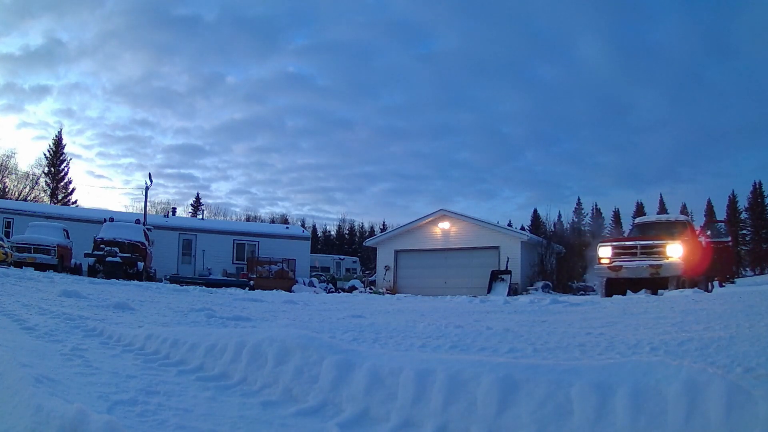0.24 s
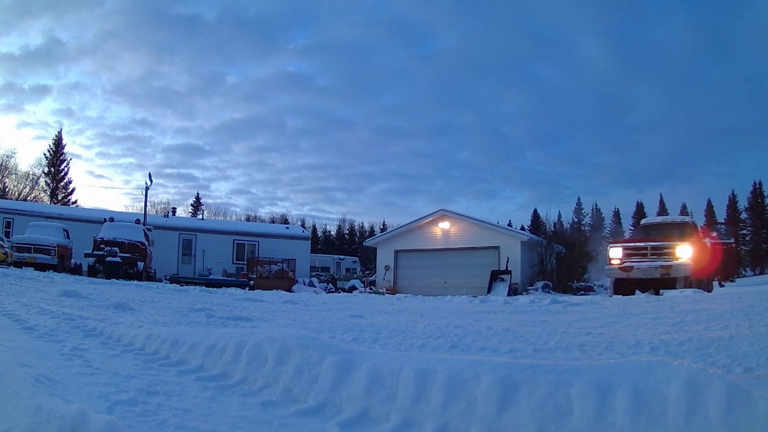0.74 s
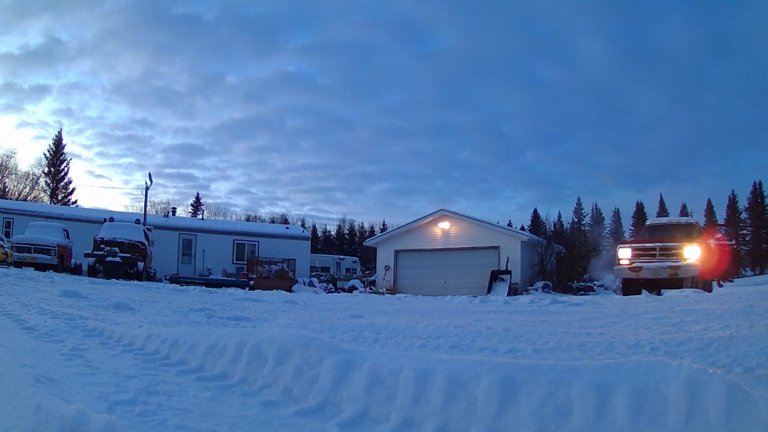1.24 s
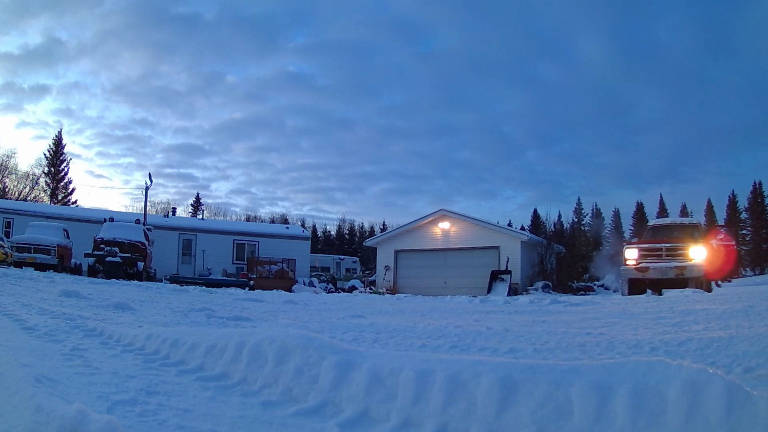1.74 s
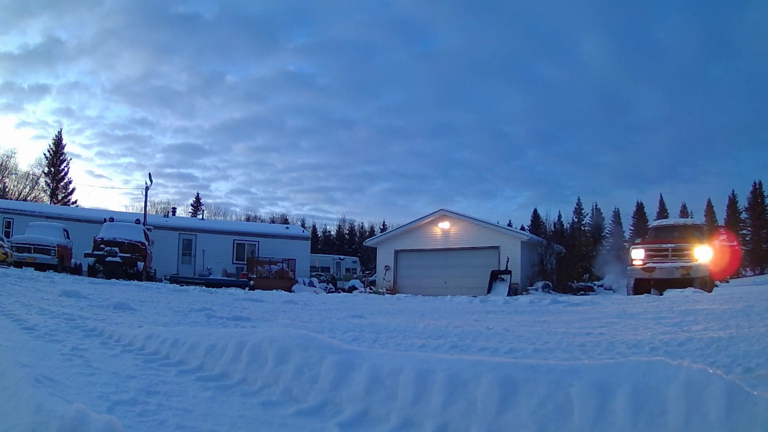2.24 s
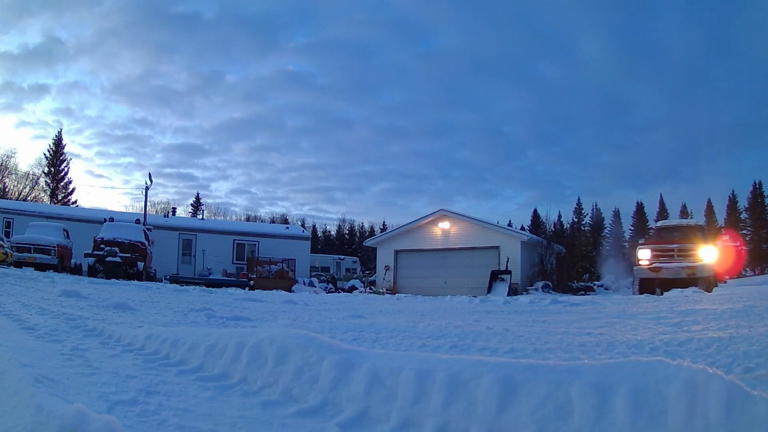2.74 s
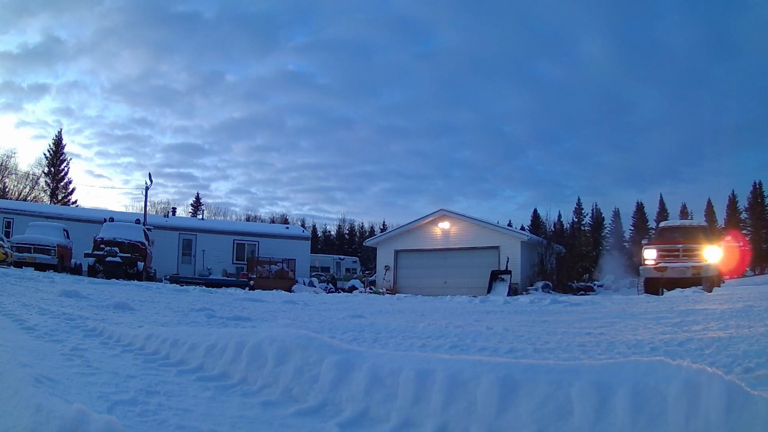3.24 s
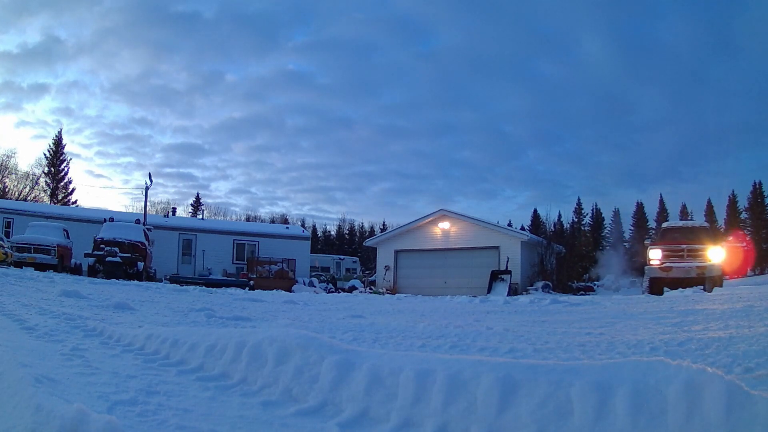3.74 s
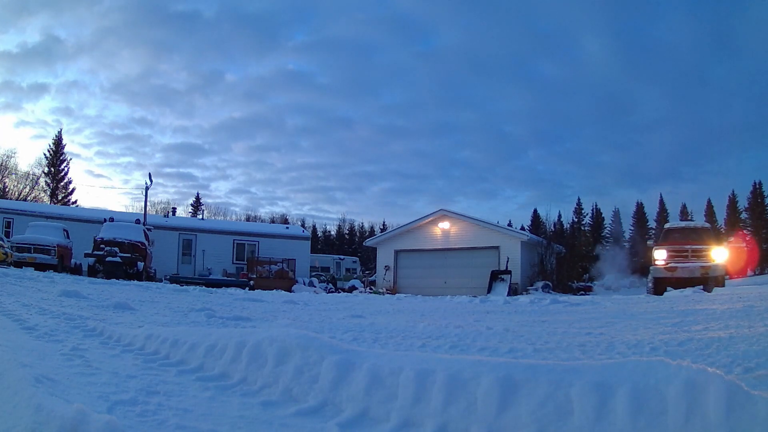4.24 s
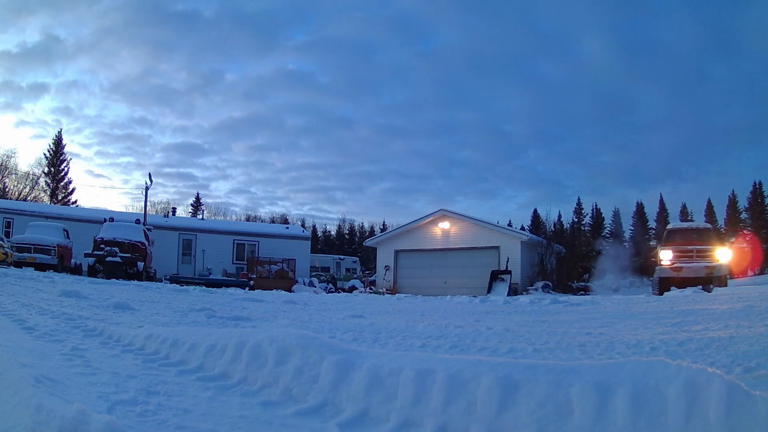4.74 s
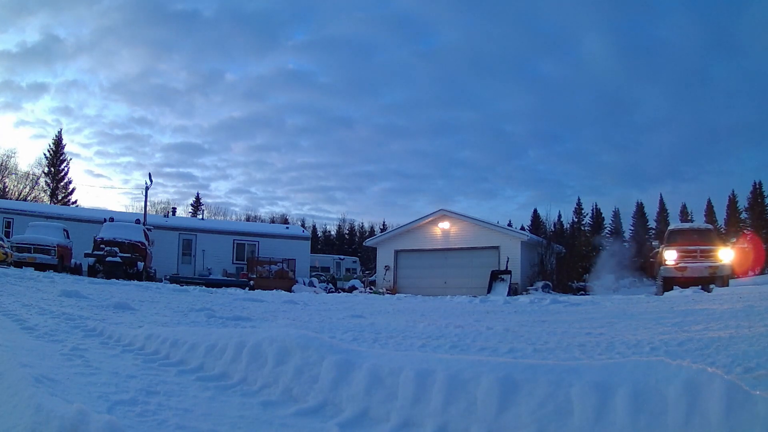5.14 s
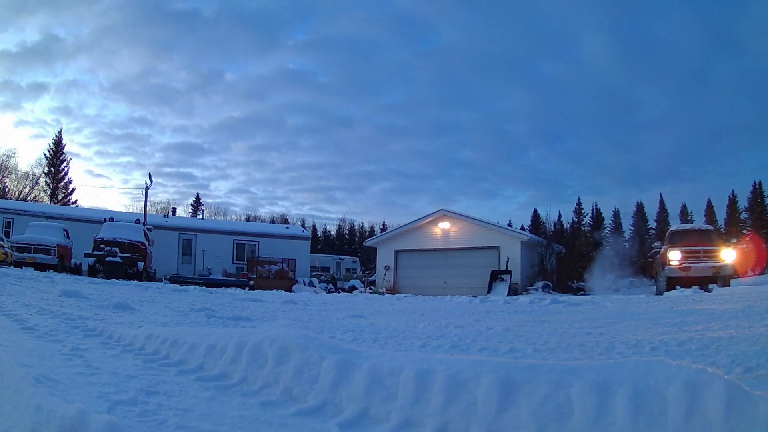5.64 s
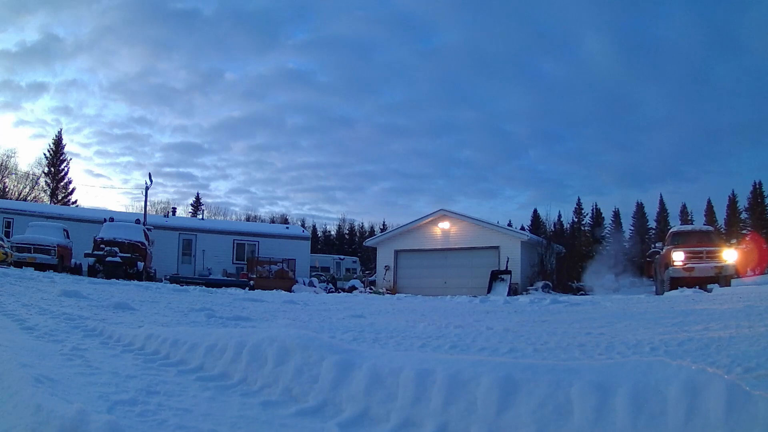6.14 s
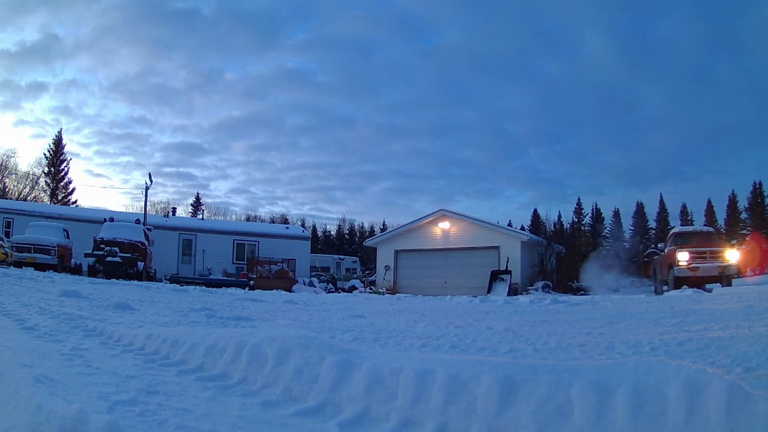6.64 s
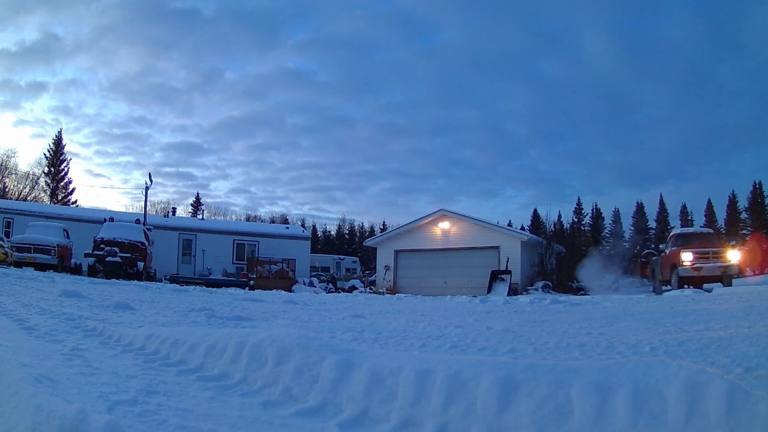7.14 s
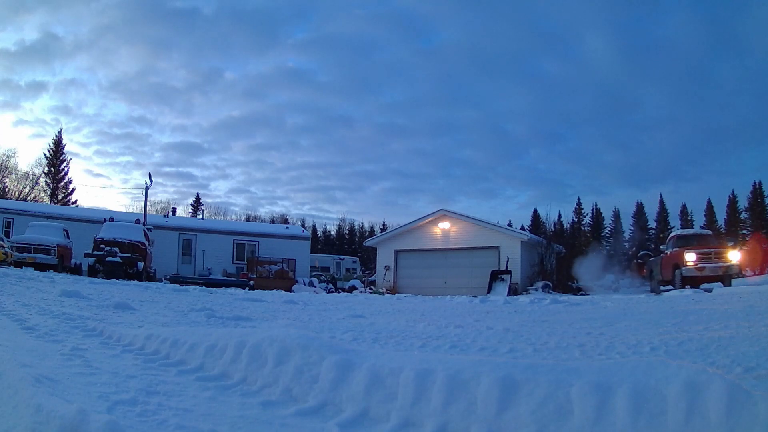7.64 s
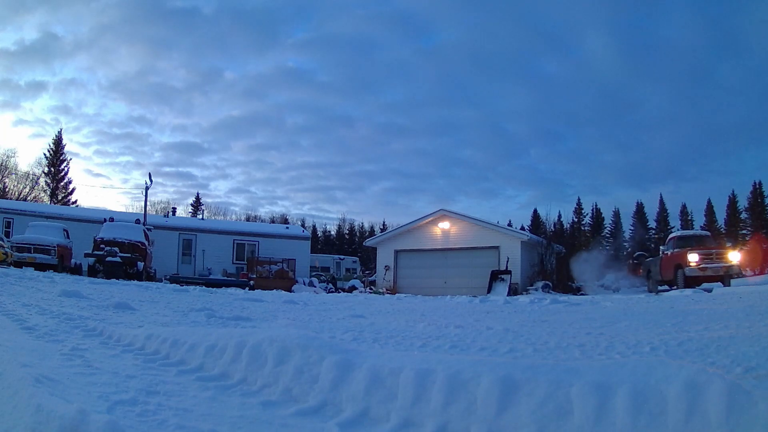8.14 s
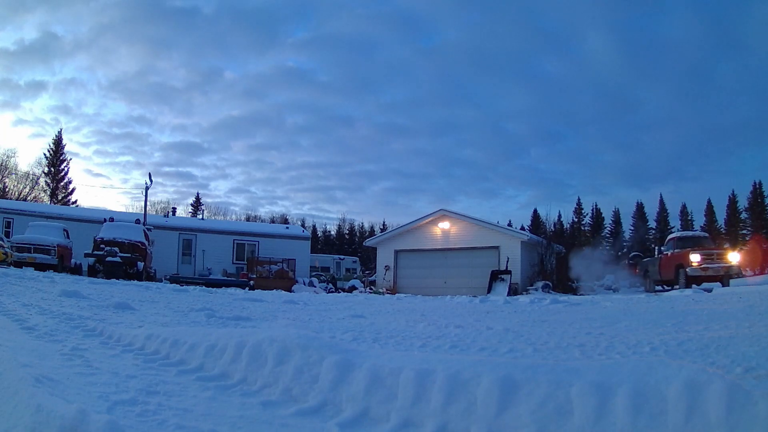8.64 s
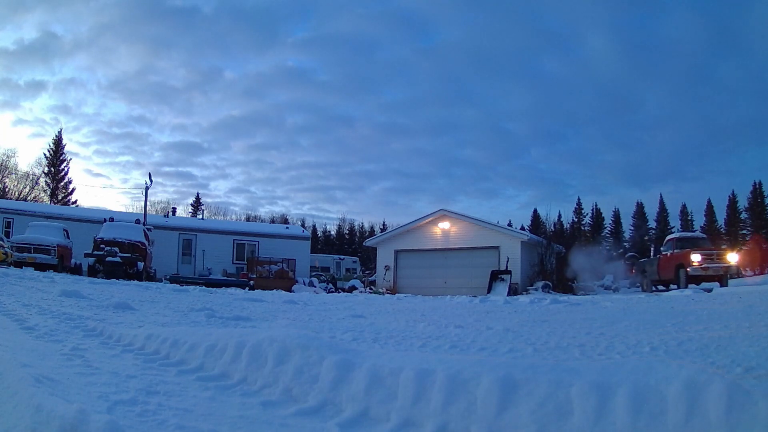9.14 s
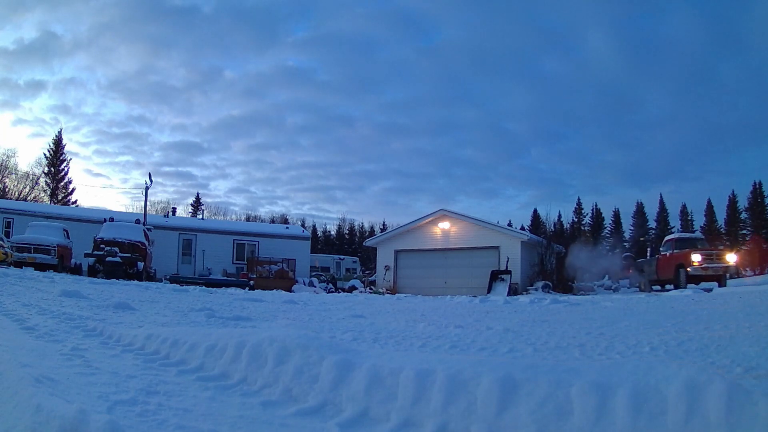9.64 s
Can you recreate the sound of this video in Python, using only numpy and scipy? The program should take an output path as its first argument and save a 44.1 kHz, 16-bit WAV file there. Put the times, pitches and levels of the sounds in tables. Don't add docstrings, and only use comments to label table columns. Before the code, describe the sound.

Outdoors in a snowy yard, a pickup truck with an eight-cylinder engine idles softly and burbles. At about one second hitch links rattle and clunk, then the revs climb into a deep, loud exhaust drone. The drone strengthens, gains hard knocking late on, then drops abruptly to a quiet idle near nine seconds. A single fixed microphone some distance away adds faint hiss.

```python
import sys
import numpy as np
from scipy import signal
from scipy.fft import rfft, irfft
from scipy.io import wavfile

SR = 44100
rng = np.random.default_rng(int(sys.argv[2]) if len(sys.argv) > 2 else 0)


def log_audio(samples):
    frames = np.atleast_2d(samples).T
    limited = np.clip(frames, -1, 1)
    pcm = np.round(limited * 32767).astype(np.int16)
    wavfile.write(sys.argv[1], SR, pcm)


def volts_from_db(level):
    exponent = np.asarray(level, float) / 20
    return 10 ** exponent


N = 437031

# pitch_hz, level_db (per Hz)
HISS = [(2940, -23), (5000, -16), (6100, -14), (6630, -5.5), (10000, -4), (11900, -4), (15200, -4.5),
        (16000, -7)]
HISS_DB = -62.5
# pitch_hz, level_db
WHINE = [(13749, -87)]

# start_s, level_db
HITCH_RATTLE = [
    (.92, -71),
    (.95, -68),
    (.97, -50.5),
    (1.0, -58.5),
    (1.035, -63),
    (1.05, -75),
]
# pitch_hz, width_hz, level_db
HITCH_RING = [(4500, 250, 2), (3450, 400, -9), (5600, 700, -14), (2000, 1000, -1)]

# pitch_hz, level_db (per Hz)
CLATTER = [(500, 2), (800, -2), (1300, -4), (2000, -6), (2800, -9.5), (4000, -19.5), (6000, -13.5),
           (8000, -25.5)]
# pitch_hz, width_hz, level_db
BLOCK_PANELS = [(1320, 79, 2), (3493, 176, 0), (4420, 440, -2), (5450, 270, -4.5)]
CLATTER_DB, CLATTER_LOAD_DB = -60.5, 2.1
IDLE_PANELS_DB, FACING_PANELS_DB = 2.5, -1.5

# pitch_hz, width_hz, level_db
KNOCK_RING = [(1800, 450, -5), (2500, 260, 1), (2950, 350, -6), (4450, 300, -8), (5300, 500, -10)]
KNOCK_CYLINDERS_DB = [0, -9, -3.5, -2, -8, -4, -7, -3.5]
KNOCK_REST_DB, KNOCK_BITE_DB, KNOCK_PEAK_DB = -80, -69, -62.3

# pitch_hz, width_hz, level_db
TAILPIPE = [(243.5, 48, 1.5), (278.4, 27, 2.5), (337, 63, -6.5), (413, 128, -14)]
RASP_DB, RASP_FADE_DB_PER_S, RASP_STRAIN_DB = -47, -0.75, -8

# pitch_hz, level_db (per Hz)
ROAR = [(20, -10), (30, -6), (50, -8), (75, -2), (100, -1), (150, -4), (200, -4), (270, -7), (340, -14),
        (450, -20), (600, -26), (800, -33), (1100, -45)]
ROAR_DB, ROAR_LOAD_DB, ROAR_TURN_DB = -48, 3.5, -4

# start_s, firing_rate_hz, exhaust_tone_db
RUN = [(0, 44.1, -39.6), (.9, 44.7, -39.6), (1.1, 41.5, -40), (1.3, 45.6, -39.7), (1.6, 50.3, -42),
       (1.76, 54.7, -30.5), (1.96, 57.6, -30.3), (2.9, 57.4, -29.8), (3.8, 59.8, -26.8), (4.38, 62.2, -22),
       (4.62, 61.2, -23.8), (5.0, 62.4, -21.8), (7.0, 62.9, -23), (8.93, 62, -19.2), (9.07, 56.3, -22.5),
       (9.16, 51.9, -37.5), (9.4, 45.2, -42), (9.91, 46.1, -40.3)]
# firing_rate_hz, second_db, third_db, fourth_db
OVERTONES = [(44.2, -36, -43, -41.5), (46.8, -40, -43.5, -44.5), (51.2, -34, -44.5, -42.5),
             (55.2, -34, -35.5, -56), (57.6, -37.5, -36, -84), (60, -33, -40, -73), (61.1, -32.5, -46, -46),
             (61.6, -33, -52.5, -59), (62.9, -30, -48, -50)]
# eighth (order modulo 8), idle_db, speeding_up_db,
# light_pull_db, full_pull_db
BURBLE = [(1, -33, -25, -17, -17), (2, -28, -29, -21, -19), (3, -19, -13, -12, -17),
          (4, -30, -23, -18, -19), (5, -19, -17, -11, -11), (6, -30, -24, -25, -22),
          (7, -26, -23, -20, -21)]
PULL_HZ = [45, 49.5, 57.5, 62]
CYLINDERS = [
    [.89, 1.14, .75, 1.21, 1.11, .86, 1.2, .79],
    [.64, .95, 1.2, .86, 1.36, 1.05, .87, 1.14],
]
# pitch_hz, idle_db, load_db
PIPE = [(28, -54, -58), (62, -25, -24), (85, -29, -35), (115, -36, -28), (150, -31, -35), (175, -22, -34),
        (205, -28, -40), (330, -61, -49)]
MUFFLER_HZ, MUFFLER_WIDTH_HZ = 162, 12
LEAN, FACING_LEAN = 2.2, .65
FACING_DB = 2.5
TURN_TILT_DB, COAST_TILT_DB, COAST_BOOST_DB = -1.5, -3, 2.5
BOOM_HZ, BOOM_WIDTH_HZ = 177.7, 20
BOOM_SHADOW_DB, BURBLE_SHADOW_DB = -9, -6.5

IDLE_HZ, PULLING_HZ = 46, 56
TURN_FROM_S, TURN_TO_S = 5.0, 8.6
FACING_S, FACING_WIDTH_S = 7.68, 1.57
STRAIN_S, BITE_S, BUILD_S = 6.6, .25, 1.5
LIFT_S, LET_GO_S = 8.98, .1


def rms_one(x):
    return x / np.sqrt(np.mean(x ** 2) + 1e-20)


def in_time(rows):
    s, *columns = np.transpose(rows)
    return [np.interp(np.arange(N) / SR, s, c) for c in columns]


def drift(rate, count=1):
    r = np.exp(-80 * np.pi * rate / SR)
    white = rng.standard_normal((count, N // 40 + 2002))
    slow = signal.lfilter([1], [1, -2 * r, r * r], white)[:, 2000:]
    return np.array([np.interp(np.arange(N) / 40, np.arange(len(v)), rms_one(v)) for v in slow])


def coloured(points):
    hz, db = np.transpose(points)
    grid = np.arange(1, N // 2 + 2) * SR / N
    shape = np.interp(np.log(grid), np.log(hz), db, left=-70, right=-70)
    return rms_one(irfft(rfft(rng.standard_normal(N)) * volts_from_db(shape), N))


def resonate(x, peaks):
    out = 0
    for k, (hz, width, db) in enumerate(peaks):
        r = np.exp(-np.pi * width / SR)
        b = (1 - r * r) / 2 * np.array([1, 0, -1])
        a = [1, -2 * r * np.cos(2 * np.pi * hz / SR), r * r]
        out = out + (-1) ** k * volts_from_db(db) * signal.lfilter(b, a, x + 1e-18)
    return out


def microphone():
    whine = sum(volts_from_db(db) * np.sin(2 * np.pi * hz * np.arange(N) / SR) for hz, db in WHINE)
    hiss = coloured([(300, 12.8), *HISS[1:]])
    wander_db = 0.38 * drift(3.6)[0] + 0.43 * drift(14)[0]
    return volts_from_db(HISS_DB) * hiss * volts_from_db(wander_db) + whine


def hitch():
    contacts = rng.random(N) < 4000 / SR
    grains = contacts * volts_from_db(3.0 * rng.exponential(1, N)) * rng.choice([-1, 1], N)
    level_db, = in_time([(0, -120), *HITCH_RATTLE, (1.1, -120)])
    links = volts_from_db(level_db) * resonate(grains, HITCH_RING[:3])
    clunk = np.roll(volts_from_db(level_db), round(.022 * SR)) * resonate(grains, HITCH_RING[3:])
    return (links + clunk) / np.std(resonate(grains, HITCH_RING))


def clatter(firings, db, panels_db):
    pulse = 1 + 0.35 * np.exp(-6 * ((firings + .25) % 1))
    white = rng.standard_normal(N)
    panels = rms_one(resonate(white, BLOCK_PANELS))
    body = coloured(CLATTER) + volts_from_db(-7 + panels_db) * panels
    return volts_from_db(db) * rms_one(pulse * volts_from_db(0.42 * drift(4.5)[0]) * body)


def knock(firings, db):
    cylinder = np.floor(firings - .25).astype(int)
    fired = np.diff(cylinder, prepend=cylinder[0]) > 0
    out = 0
    for peak in KNOCK_RING:
        size_db = np.array(KNOCK_CYLINDERS_DB)[cylinder % 8] + 2.0 * rng.standard_normal(N)
        decay = signal.lfilter([1], [1, -.989], fired * volts_from_db(size_db))
        burst = decay * rng.standard_normal(N)
        bright_db = 2 * np.clip(db + 62.5, -4, 1) * (peak[0] > 4000)
        out = out + volts_from_db(bright_db) * resonate(burst, [peak])
    return volts_from_db(db) * rms_one(out)


def rasp(firings, db):
    fired = np.diff(np.floor(firings), prepend=np.floor(firings[0])) > 0
    rings = 0
    for hz, width, level_db in TAILPIPE:
        kicks = fired * rng.standard_normal(N)
        once = resonate(kicks, [(hz, width, level_db)])
        rings = rings + resonate(once, [(hz, width, 0)])
    return volts_from_db(db) * rms_one(rings)


def roar(firings, db):
    puff = 1 + 0.13 * np.cos(2 * np.pi * firings)
    return volts_from_db(db) * rms_one(puff * coloured(ROAR))


def late(hz):
    return 1.7 / (1 + np.exp((MUFFLER_HZ - hz) / MUFFLER_WIDTH_HZ))


def hidden(hz, turn):
    return turn * np.exp(-((hz - BOOM_HZ) / BOOM_WIDTH_HZ) ** 2)


def passed(hz, load):
    pipe_hz, idle_db, load_db = np.transpose(PIPE)
    at_idle = np.interp(np.log(hz), np.log(pipe_hz), idle_db)
    at_load = np.interp(np.log(hz), np.log(pipe_hz), load_db)
    return (1 - load) * at_idle + load * at_load


def exhaust(firings, rate_hz, tone_db, load, turn, facing):
    step = slice(None, None, 10)
    rate, load, turn, facing = rate_hz[step], load[step], turn[step], facing[step]
    angle = 2 * np.pi * firings[step]
    lean = LEAN + FACING_LEAN * facing

    speeds, *levels = np.transpose(OVERTONES)
    second, *upper = [np.interp(rate, speeds, db) for db in levels]
    tones_db = [tone_db[step], second + FACING_DB * facing]
    tones_db += [db + BOOM_SHADOW_DB * hidden(k * rate, turn) for k, db in enumerate(upper, 3)]
    wobble = drift(11.0, count=4)[:, step]
    out = 0
    for k, db in enumerate(tones_db, 1):
        level = volts_from_db(db + .25 * k * wobble[k - 1])
        out = out + level * np.cos(k * angle - lean - late(k * rate))

    pattern = np.angle(np.fft.fft(CYLINDERS))
    flutter = drift(4.3, count=6)[:, step]
    orders = [order for order in range(5, 44) if order % 8]
    paths = 1.3 * rng.standard_normal(len(orders))
    coast = turn * (1 - load)
    for k, order in enumerate(orders):
        hz = order * rate / 8
        db = np.interp(rate, PULL_HZ, BURBLE[order % 8 - 1][1:]) + passed(hz, load)
        db += COAST_BOOST_DB * coast + BURBLE_SHADOW_DB * (1 - load) * hidden(hz, turn)
        db += (TURN_TILT_DB * turn + COAST_TILT_DB * coast) * np.log2(order / 16)
        stack = np.interp(rate, PULL_HZ[::2], pattern[:, order % 8]) + paths[k] - late(hz)
        phase = order * angle / 8 + stack - lean + .4 * flutter[(k + 3) % 6]
        out += volts_from_db(db + 1.2 * flutter[k % 6]) * np.cos(phase)
    return np.sqrt(2) * signal.resample_poly(out, 10, 1, padtype="line")[:N]


def controls(rate_hz):
    s = np.arange(N) / SR
    load = np.clip((rate_hz - IDLE_HZ) / (PULLING_HZ - IDLE_HZ), 0, 1)
    turn = np.interp(s, [TURN_FROM_S, TURN_TO_S], [0, 1])
    facing = np.exp(-((s - FACING_S) / FACING_WIDTH_S) ** 2)
    bitten_s, let_go_s = STRAIN_S + BITE_S, LIFT_S + LET_GO_S
    strain = np.interp(s, [bitten_s, bitten_s + BUILD_S, LIFT_S, let_go_s], [0, 1, 1, 0])
    bite = np.interp(s, [STRAIN_S, bitten_s, LIFT_S, let_go_s], [0, 1, 1, 0])
    return load, turn, facing, strain, bite


def scene():
    rate_hz, tone_db = in_time(RUN)
    load, turn, facing, strain, bite = controls(rate_hz)
    firings = np.cumsum(rate_hz) / SR - .3

    panels_db = IDLE_PANELS_DB * (1 - load) * (1 - turn) + FACING_PANELS_DB * facing
    knock_db = KNOCK_REST_DB + (KNOCK_BITE_DB - KNOCK_REST_DB) * bite
    knock_db += (KNOCK_PEAK_DB - KNOCK_BITE_DB) * strain
    rasp_db = RASP_DB + RASP_FADE_DB_PER_S * np.arange(N) / SR + RASP_STRAIN_DB * strain

    mix = microphone() + hitch()
    mix += clatter(firings, CLATTER_DB + CLATTER_LOAD_DB * load, panels_db)
    mix += knock(firings, knock_db)
    mix += rasp(firings, rasp_db)
    mix += roar(firings, ROAR_DB + ROAR_LOAD_DB * load + ROAR_TURN_DB * turn)
    mix += exhaust(firings, rate_hz, tone_db, load, turn, facing)
    return mix[None]


def band_limit(x):
    return signal.sosfilt(signal.butter(12, 16250, fs=SR, output="sos"), x)


def record(dry):
    from_edge = np.minimum(np.arange(N), N - 1 - np.arange(N))
    ends = np.clip(from_edge / (.003 * SR), 0, 1)
    return band_limit(dry * ends ** 2 * (3 - 2 * ends))


dry = scene()
out = record(dry)
log_audio(out)
```